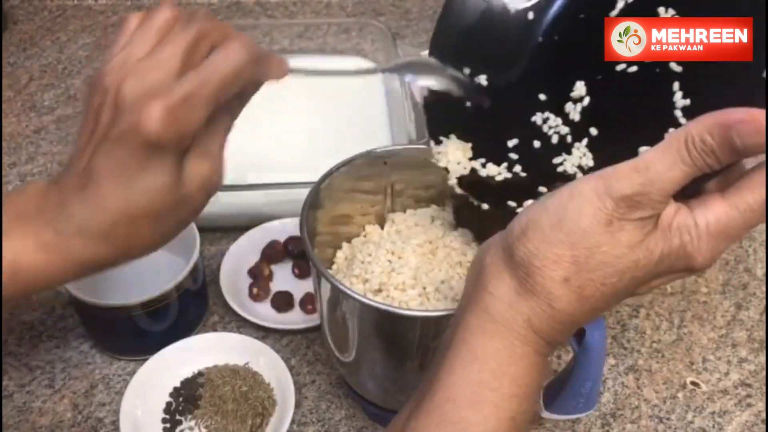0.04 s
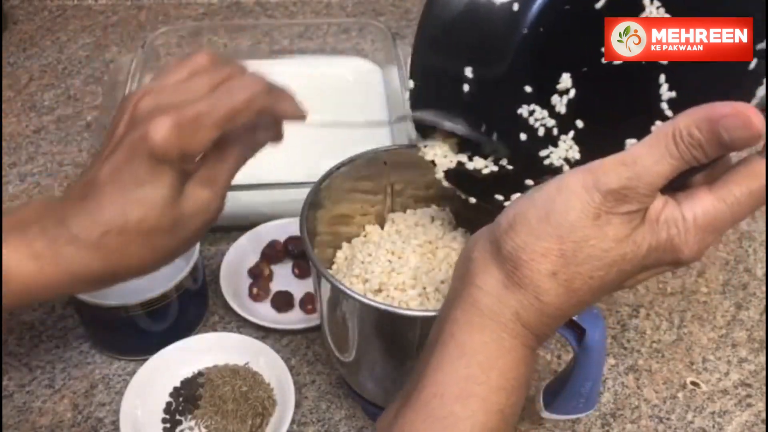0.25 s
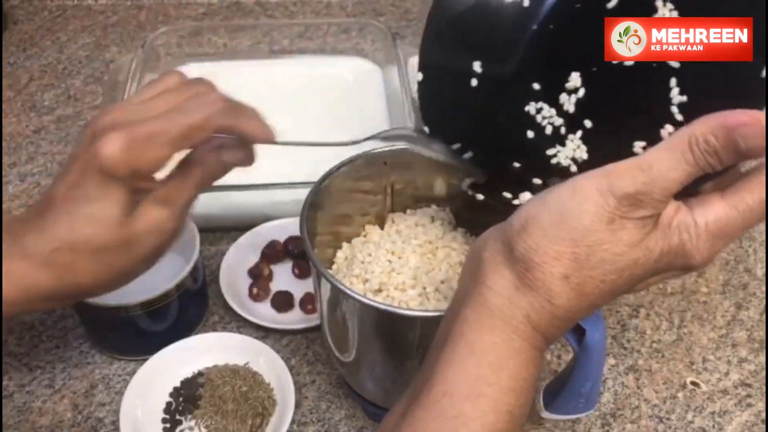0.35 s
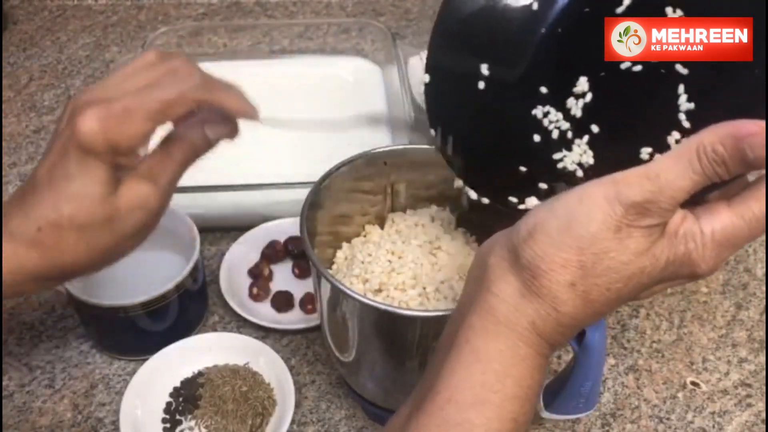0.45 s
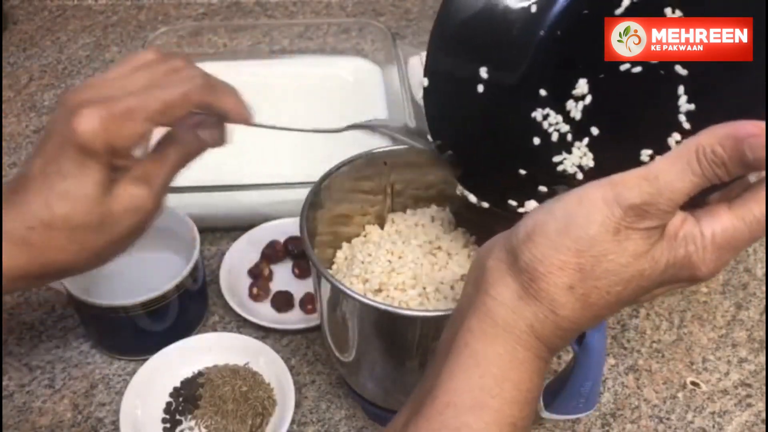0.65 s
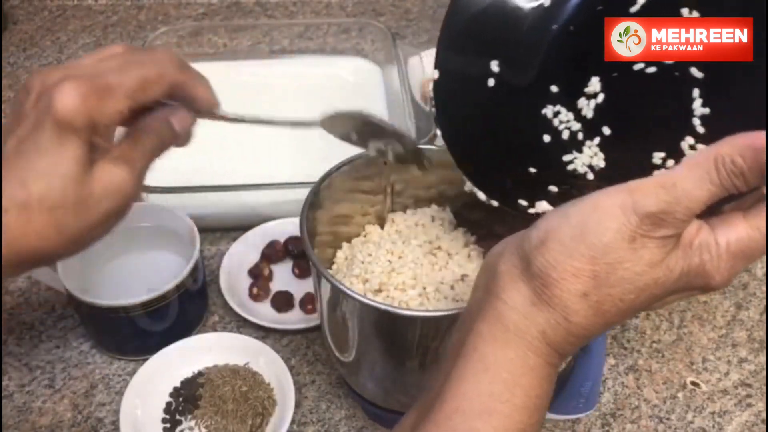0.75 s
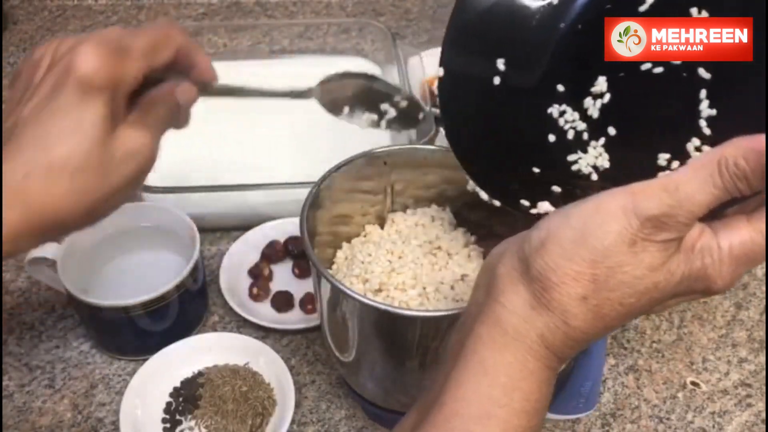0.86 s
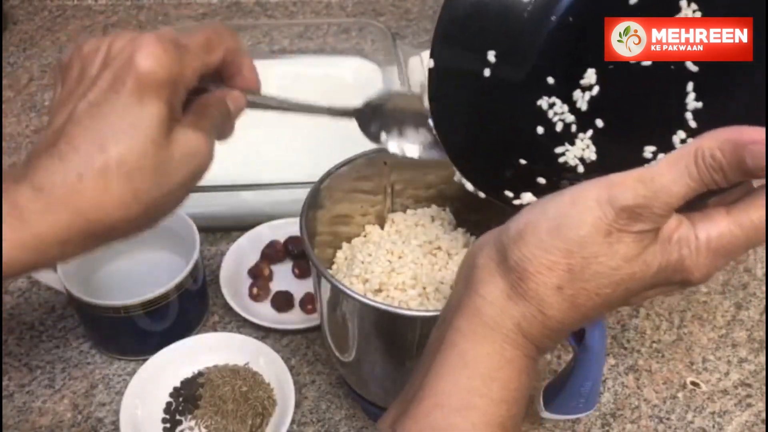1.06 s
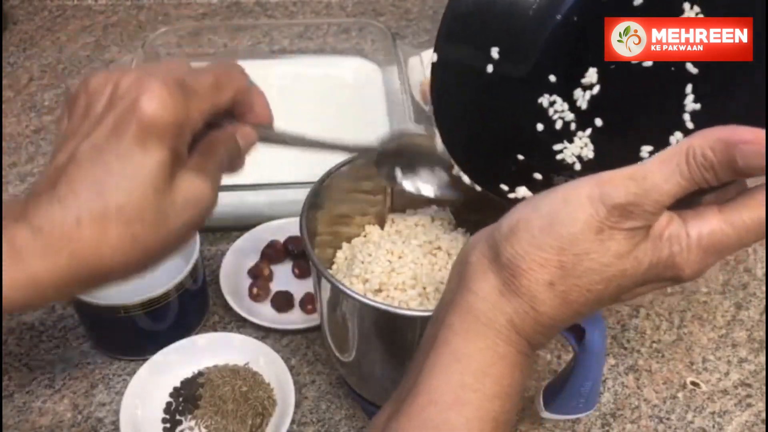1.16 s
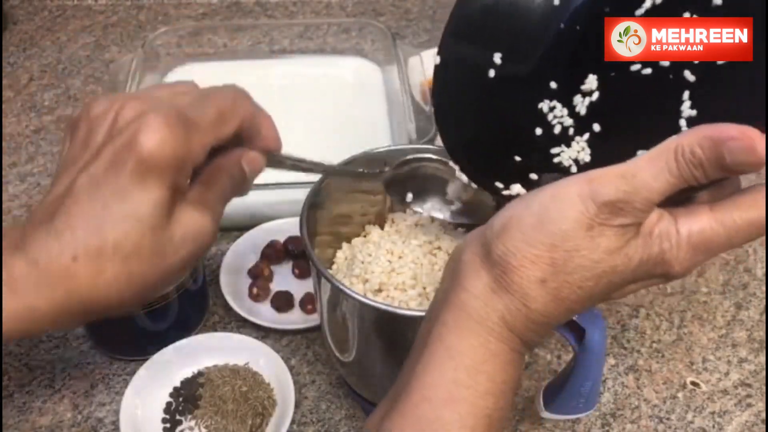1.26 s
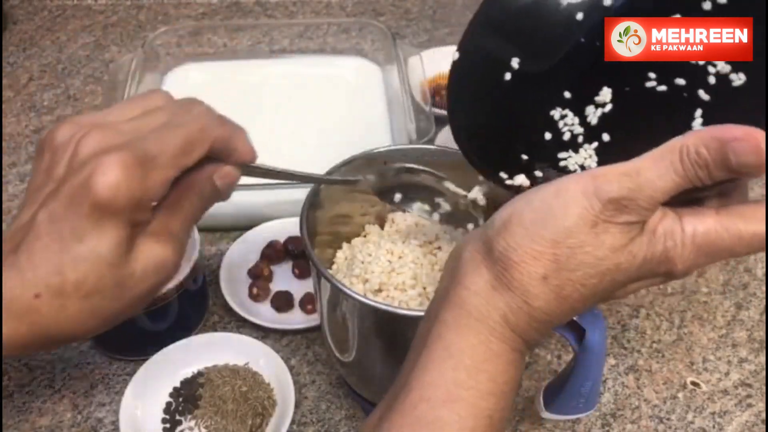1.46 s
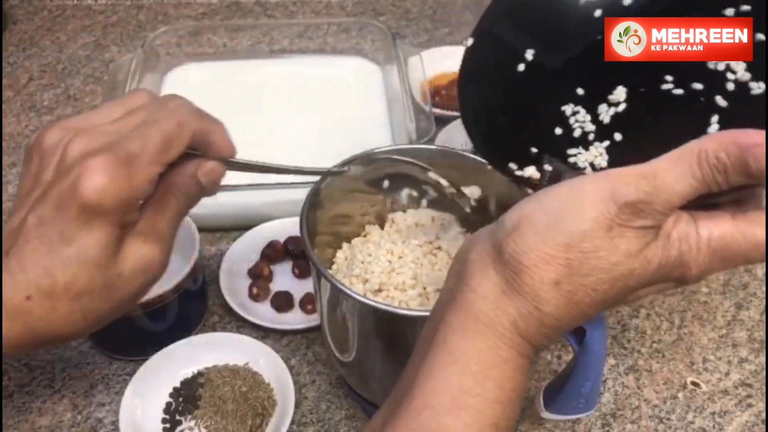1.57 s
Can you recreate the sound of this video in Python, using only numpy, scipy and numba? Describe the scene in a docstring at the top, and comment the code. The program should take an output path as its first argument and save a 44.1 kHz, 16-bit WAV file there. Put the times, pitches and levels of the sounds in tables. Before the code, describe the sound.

Spoon scraping a bowl's wall: three bright clinks, each followed by a gritty metallic drag

```python
"""Low appliance hum and dull room air waver throughout: slow-modulated sines and coloured noise.
Two faint metal touches (noise bursts), then a steel spoon knocks on the wall of a dark bowl held over a jar
and drags along it: a short push, then dense grains, ring the same modes of spoon and bowl.
A second knock and drag, two more touches, then a third knock with the longest drag.
A small hard kitchen answers the spoon with a decaying noise tail."""
import sys
import numpy as np
from scipy import signal
from scipy.fft import rfft, irfft
from scipy.io import wavfile
from scipy.ndimage import uniform_filter1d
from numba import njit

SR = 44100
rng = np.random.default_rng(int(sys.argv[2]) if len(sys.argv) > 2 else 0)


def voltage_ratio(level):
    """Linear amplitude factor for a level in decibels (scalar or array-like)."""
    return 10 ** (np.asarray(level, float) / 20)


def unload_audio(sound):
    """Save the sound as a 16-bit wav file, at the path given as the first command line argument."""
    columns = np.transpose(np.atleast_2d(sound))
    # keep every value between -1 and 1, then stretch to whole-number steps
    steps = np.round(np.clip(columns, -1, 1) * 32767)
    wavfile.write(sys.argv[1], SR, steps.astype(np.int16))


N = 70560

# knocks of the spoon: t/s, level/dB, crack re knock/dB, dull thud of the wall re knock/dB
KNOCKS = [(0.2292, -7.5, 0, -26), (0.6163, -9.5, -5.5, -28.5), (1.0346, -14, 2, -25.5)]
# modes of spoon and bowl: f/Hz, t60/s, level/dB at 1st, 2nd, 3rd spot struck, gain added when rubbed/dB
MODES = [(595, 0.078, -32.5, -30.5, -31, -12), (1400, 0.035, -25, -21.5, -15, -12.5),
         (2200, .2, -18.5, -21, -8.5, 6), (2389, 0.037, -31, -21.5, -19.5, 21),
         (2910, .05, -28, -9, -9.5, -1), (3205, 0.069, -6, -9, -3.5, -5.5),
         (3258, .1, -15.5, -17.5, -7.5, 11.5), (3230, 0.022, -34.5, -36, -15, 5),
         (3805, 0.03, -16.5, -22, -49.5, 3.5), (4145, 0.26, -8.5, -20.5, -11.5, 3.5),
         (4400, 0.056, -4, -8, -7.5, 11.5), (4500, .1, -22.5, -8, -8.5, 9.5),
         (4436, 0.071, -25, -19.5, -13.5, 9.5), (5785, .12, -23, -22.5, -18.5, 9.5),
         (4600, 0.085, -29.5, -22, -21, 4), (5160, 0.025, -21.5, -10.5, -15.5, -7),
         (5350, 0.039, -20.5, -5.5, -3.5, -9.5), (5800, 0.062, -3.5, -0.5, 0, 7),
         (6630, 0.066, -13.5, -7, -4, 4), (6820, 0.11, -26.5, -4.5, -5.5, -7.5),
         (7304, 0.055, -9.5, -5.5, -1, -5.5), (7620, 0.087, -14.5, -18.5, -30, -5.5),
         (8400, 0.041, -15, -8.5, -15.5, 7), (8950, 0.036, -23, -13.5, -10, 14),
         (9210, 0.13, -9.5, -15.5, -24.5, -5), (9567, 0.078, -15, -12, -45.5, 9),
         (10490, .07, -12.5, -9.5, -15.5, -15), (10880, .045, -17, -11, -5, -8.5),
         (11390, 0.041, -13.5, -13.5, -13.5, -1.5)]
# path of each drag, one list per knock:
# t/s, level/dB, contact resonance f/Hz, low rasp re level/dB, low resonance f/Hz, treble/dB
DRAGS = [
    [(.231, -18, 3310, -17, 1400, -1), (.263, -28, 3350, -25, 1227, 1), (.295, -35.5, 3395, -16, 1500, -8),
     (.32, -26, 3320, -19, 1464, -12.5), (.345, -26.5, 3550, -22, 1630, -9.5),
     (.37, -24, 3780, -27, 1910, -7), (.41, -29, 3930, -27.5, 2000, -0.5),
     (.447, -25, 4375, -26.5, 1840, -4), (.475, -44.5, 4400, -18, 1530, -2)],
    [(.618, -12.5, 4530, -27, 1300, -4), (.655, -26.5, 4710, -19, 1234, -11),
     (.685, -30.5, 4500, -26, 1330, -11.5), (.705, -23.5, 4500, -27.5, 1490, -14),
     (.73, -41.5, 4500, -17, 1540, -15), (.76, -53.5, 4500, -14, 1500, -16)],
    [(1.036, -24.5, 4560, -24, 1370, -10.5), (1.06, -23.5, 4400, -23, 1400, -13.5),
     (1.102, -28, 4350, -16.5, 1687, -14), (1.146, -21.5, 4220, -21.5, 1680, -16),
     (1.184, -22, 4500, -25, 1600, -11), (1.21, -28.5, 4160, -23, 1370, -8.5),
     (1.232, -21, 4300, -34, 1450, -11), (1.26, -26, 4490, -27, 1470, -14),
     (1.302, -27.5, 4400, -24, 1400, -10.5), (1.328, -29.5, 4200, -22.5, 1356, -9),
     (1.362, -35, 4200, -12, 1300, -14.5), (1.43, -42.5, 4220, -17, 1300, -7.5),
     (1.455, -61, 4200, -12, 1350, -8)],
]
# spectrum of the broad rasp and crack: f/Hz, level/dB
GRIT_SPECTRUM = [(1060, -48.5), (1800, -16.5), (2310, -0.5), (2900, -9.5), (3200, -0.5), (4570, -6),
                 (5160, -8), (5930, -1), (6170, -11), (11200, -16), (12500, -57.5), (16200, -93),
                 (22000, -120)]
# spectrum of the low rasp: f/Hz, level/dB
LOW_RASP_SPECTRUM = [(350, -50.5), (600, -26.5), (913, -5), (1220, -9), (1550, 6), (2100, -1.5),
                     (2730, -34.5), (4620, -120)]
# bands the wall hardly radiates: f/Hz, width/Hz
WALL_NULLS = [(2850, 170), (5030, 230), (6750, 83), (10600, 300)]
# single modes that swell under the drag: middle t/s, length/s, f/Hz, width/Hz, level at middle/dB
MODE_SWELLS = [(0.304, 0.039, 3280, 68, -28), (0.38, 0.028, 5800, 80, -28.5),
               (.385, 0.068, 3805, 68.6, -30.5), (0.453, 0.05, 2198, 59.6, -38.5),
               (0.698, 0.019, 5800, 70, -37), (1.07, 0.066, 2140, 59.6, -38),
               (1.14, 0.077, 2380, 72.5, -40), (1.222, 0.082, 3255, 48, -25.5),
               (1.231, 0.059, 4426, 89, -26), (1.273, 0.15, 942, 117, -50.5), (1.354, 0.075, 905, 117, -51),
               (1.309, .02, 1360, 80, -43.5), (1.337, 0.037, 3223, 58.5, -33),
               (1.33, 0.059, 4110, 49.7, -47), (1.202, 0.21, 4436, 30.1, -38.5),
               (1.22, 0.29, 5853, 34.4, -42), (1.276, 0.23, 3258, 24.8, -36.5),
               (0.344, 0.02, 3520, 70, -35), (0.434, 0.028, 4130, 80, -32.5),
               (1.408, 0.053, 3260, 50.8, -41), (1.4, 0.091, 2226, 48, -43)]
# faint touches of the spoon: t/s, level/dB, f/Hz, decay time constant/s
TOUCHES = [(.0, -57.5, 4500, 0.025), (0.05, -59.5, 3650, 0.024), (0.812, -53, 7470, 0.018),
           (.83, -58.5, 11120, 0.032)]
# appliance hum lines: f/Hz, level/dB before the waver
HUM_LINES = [(58.5, -58.5), (76, -66.5), (124, -61), (143, -60)]
# spectrum of the room air: f/Hz, level/dB
AIR_SPECTRUM = [(50, -67), (85, -32), (135, -10.5), (253, -11), (287, -4), (325, -18.5), (538, -14),
                (610, -21), (706, -18.5), (908, -30), (967, -27.5), (1410, -25), (2100, -35.5),
                (2820, -34.5), (12700, -54.5), (16600, -97.5), (22000, -120)]
# common waver of hum and air: t/s, gain/dB
BACKGROUND_GAIN = [(0, 4.5), (.6, 2), (.9, 5.5), (1.3, 3), (1.6, 8.5)]

PUSH_DECAY_S, CRACK_DECAY_S, THUD_DECAY_S, THUD_HZ = 0.00047, 0.0042, 0.008, 860
GRAINS_PER_S, GRAIN_SPREAD_DB, CATCH_DB = 4000, 2, 1.4
RUB_RING_DB, RUB_GRIT_DB, CONTACT_DB, LOW_RING_DB = -5.5, -7.5, -14, 1
CONTACT_WIDTH_RATIO, LOW_WIDTH_RATIO = 0.2, 0.099  # width / centre, per filter pass
TREBLE_SPLIT_HZ, RASP_TREBLE_DB, LIFT_DECAY_S = 7450, -9, 0.008  # treble/dB of the table is re RASP_TREBLE_DB
AIR_DB = -58  # before the waver
ROOM_T60_S, ROOM_DELAY_S, ROOM_DB, ROOM_TOP_HZ = 0.29, 0.0024, -13, 6000


def colour(x, spectrum):
    """Shape x by (f/Hz, level/dB) points through a minimum-phase response."""
    f_hz, level_db = np.array(spectrum, float).T
    grid_hz = np.maximum(np.arange(4097) * SR / 8192, 1)
    gain = voltage_ratio(np.interp(np.log(grid_hz), np.log(f_hz), level_db))
    cepstrum = irfft(np.log(gain))
    cepstrum[1:4096] *= 2  # fold to minimum phase
    cepstrum[4097:] = 0
    response = irfft(np.exp(rfft(cepstrum)))
    return signal.fftconvolve(x, response)[:N]


def unit(x):
    """Scale to rms 1."""
    return x / np.sqrt(np.mean(x ** 2))


def mode(x, hz, t60_s):
    """One decaying resonance; a unit click starts its envelope at 1."""
    pole = np.exp((2j * np.pi * hz - np.log(1000) / t60_s) / SR)
    return signal.lfilter([1], [1, -pole], x).imag


@njit
def svf(x, hz, k):
    """State-variable band-pass, moving centre, width/centre k, gain 1 at the centre."""
    y, band, low = np.empty(len(x)), 0., 0.
    for i in range(len(x)):
        g = np.tan(np.pi * hz[i] / SR)
        v = (band + g * (x[i] - low)) / (1 + g * (g + k))
        band, low, y[i] = 2 * v - band, low + 2 * g * v, k * v
    return y


def twice_svf(x, hz, k):
    """Two band-passes in series, for steeper skirts."""
    return svf(svf(x, hz, k), hz, k)


def fade(at_s, decay_s):
    """Envelope that jumps to 1 at at_s and dies away with time constant decay_s."""
    t = np.arange(N) / SR - at_s
    return (t >= 0) * np.exp(-np.maximum(t, 0) / decay_s)


def wall(x):
    """The wall of the bowl cancels a few narrow bands."""
    for hz, width_hz in WALL_NULLS:
        x = signal.lfilter(*signal.iirnotch(hz, hz / width_hz, SR), x)
    return x


def knocks():
    """A short push starts every mode; a crack of noise and a thud go with it."""
    out = np.zeros(N)
    thud_hz = np.full(N, float(THUD_HZ))
    for spot, (at_s, db, crack_db, thud_db) in enumerate(KNOCKS):
        push_env = fade(at_s, PUSH_DECAY_S)
        push = rng.standard_normal(N) * push_env
        push[int(at_s * SR) + 8] += 25  # click inside the push
        push /= np.sqrt(np.sum(push ** 2))
        ring = np.zeros(N)
        for k, row in enumerate(MODES):
            ring += (-1) ** k * voltage_ratio(row[2 + spot]) * mode(push, row[0], row[1])

        # subtracting the push envelope softens both onsets
        crack = wall(unit(colour(rng.standard_normal(N), GRIT_SPECTRUM)))
        crack = crack * (fade(at_s, CRACK_DECAY_S) - push_env)
        thud = rng.standard_normal(N) * (fade(at_s, THUD_DECAY_S) - push_env)
        thud = 4 * twice_svf(thud, thud_hz, 2.2)
        out += voltage_ratio(db) * (ring + voltage_ratio(crack_db) * crack + voltage_ratio(thud_db) * thud)
    return out


def rub_grains():
    """Sparse uneven grains plus noise, as the spoon's edge catches and slips; rms 1."""
    spread_db = GRAIN_SPREAD_DB * rng.exponential(size=N).clip(0, 4)
    grains = (rng.random(N) < GRAINS_PER_S / SR) * rng.standard_normal(N) * voltage_ratio(spread_db)
    catch = voltage_ratio(CATCH_DB * unit(uniform_filter1d(rng.standard_normal(N), size=250)))
    return unit(catch * (unit(grains) + 0.78 * rng.standard_normal(N)))


def drags():
    """Grains under the spoon's edge feed the modes, two wandering resonances and broad and low rasps."""
    out, t, modes = np.zeros(N), np.arange(N) / SR, np.array(MODES, float)
    high_pass = signal.butter(4, TREBLE_SPLIT_HZ, "high", fs=SR, output="sos")
    low_pass = signal.butter(4, TREBLE_SPLIT_HZ, fs=SR, output="sos")
    for spot, rows in enumerate(DRAGS):
        s, db, contact_hz, low_db, low_hz, treble_db = np.array(rows, float).T
        grains = rub_grains()
        lift = np.exp(-np.maximum(t - s[-1], 0) / LIFT_DECAY_S)
        press = voltage_ratio(np.interp(t, s, db)) * (t >= s[0]) * lift

        gain = voltage_ratio(modes[:, 2 + spot] + modes[:, 5])
        ring = np.zeros(N)
        for k, (hz, t60_s) in enumerate(modes[:, :2]):
            ring += gain[k] * mode(np.roll(grains, 37 * k) * press, hz, t60_s)  # own grain timing per mode
        # expected rms of the modes under steady unit grains
        ring /= np.sqrt(np.sum(gain ** 2 * modes[:, 1]) * SR / (4 * np.log(1000)))

        grit = unit(colour(grains, GRIT_SPECTRUM))
        contact = unit(twice_svf(grains, np.interp(t, s, contact_hz), CONTACT_WIDTH_RATIO))
        rasp = press * wall(voltage_ratio(RUB_GRIT_DB) * grit + voltage_ratio(CONTACT_DB) * contact)
        main = voltage_ratio(RUB_RING_DB) * ring + rasp
        treble = signal.sosfilt(high_pass, main) * voltage_ratio(np.interp(t, s, treble_db) - RASP_TREBLE_DB)
        body = signal.sosfilt(low_pass, main)

        low_ring = unit(twice_svf(grains, np.interp(t, s, low_hz), LOW_WIDTH_RATIO))
        low = unit(colour(grains, LOW_RASP_SPECTRUM)) + voltage_ratio(LOW_RING_DB) * low_ring
        out += body + treble + press * voltage_ratio(np.interp(t, s, low_db)) * low
    return out


def mode_swells():
    """The rubbing catches single modes, which swell under the drag, never before its knock."""
    t, rub, out = np.arange(N) / SR, rng.laplace(size=N), np.zeros(N)
    starts_s = np.array(KNOCKS)[:, 0]
    for middle_s, length_s, hz, width_hz, db in MODE_SWELLS:
        knock_s = starts_s[starts_s < middle_s].max()
        envelope = np.exp(-(2 * (t - middle_s) / length_s) ** 2) * (t > knock_s)
        out += voltage_ratio(db) * envelope * unit(svf(rub, np.full(N, float(hz)), width_hz / hz))
    return out


def touches():
    """Light brushes of metal between the strokes: decaying band-passed noise."""
    out = np.zeros(N)
    for at_s, db, hz, decay_s in TOUCHES:
        burst = rng.standard_normal(N) * fade(at_s, decay_s)
        burst = unit(twice_svf(burst, np.full(N, float(hz)), 0.95))
        out += voltage_ratio(db) * burst * np.sqrt(decay_s * SR / N / 2)  # from whole-length rms to burst level
    return out


def room_echo(x):
    """Hard walls answer with a delayed, dulled, exponentially decaying noise tail of unit energy."""
    tail = rng.standard_normal(N) * fade(ROOM_DELAY_S, ROOM_T60_S / np.log(1000))
    tail = signal.lfilter(*signal.butter(1, ROOM_TOP_HZ, fs=SR), tail)
    return signal.fftconvolve(x, tail / np.sqrt(np.sum(tail ** 2)))[:N]


def kitchen():
    """Hum lines, each wavering in level, over dull room air."""
    t, hum = np.arange(N) / SR, np.zeros(N)
    for (hz, db), waver_db in zip(HUM_LINES, (0.4, 2.2, 2.5, 0.83)):
        slow = unit(uniform_filter1d(uniform_filter1d(rng.standard_normal(N), 1500), 1500))
        sine = np.sin(2 * np.pi * (hz * t + rng.random()))
        hum += voltage_ratio(db + waver_db * slow) * np.sqrt(2) * sine
    air = voltage_ratio(AIR_DB) * unit(colour(rng.standard_normal(N), AIR_SPECTRUM))
    return voltage_ratio(np.interp(t, *np.array(BACKGROUND_GAIN, float).T)) * (hum + air)


def scene():
    """Spoon close by, its echo from hard walls, and the kitchen."""
    spoon = wall(knocks() + drags() + mode_swells()) + touches()
    return (spoon + voltage_ratio(ROOM_DB) * room_echo(spoon) + kitchen())[None]


def roll_off(x):
    """The treble ends steeply here."""
    return signal.sosfilt(signal.butter(12, 12890, fs=SR, output="sos"), x)


def record(dry):
    """The phone rounds the loudest peaks and trims the top."""
    rounded = np.tanh(0.94 * dry) / 0.96
    top_cut = signal.ellip(8, 0.3, 40, 11950, fs=SR, output="sos")  # ripple/dB, stop/dB, edge/Hz
    mix = signal.sosfilt(top_cut, rounded)
    return roll_off(mix)


dry = scene()
out = record(dry)
unload_audio(out)
```